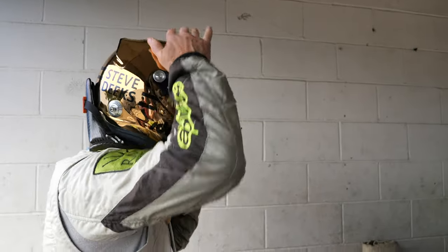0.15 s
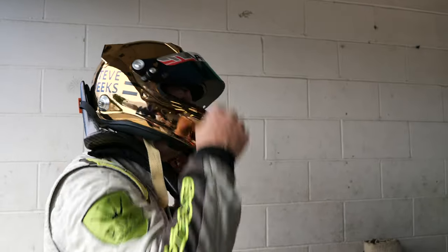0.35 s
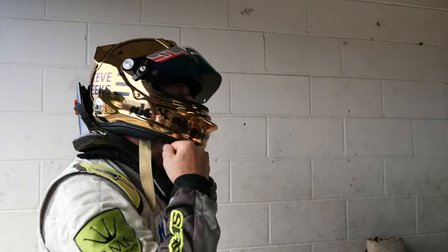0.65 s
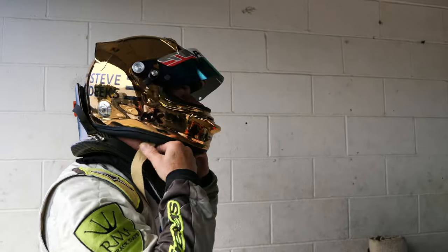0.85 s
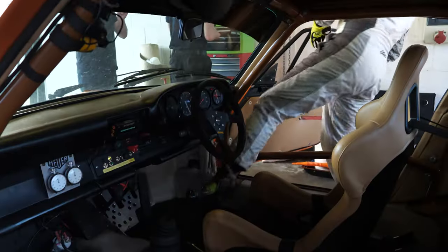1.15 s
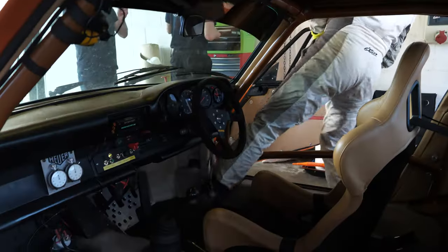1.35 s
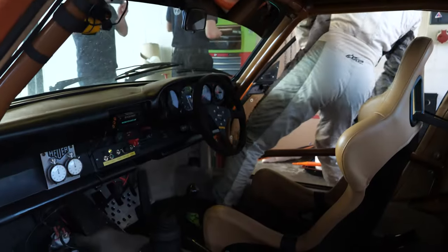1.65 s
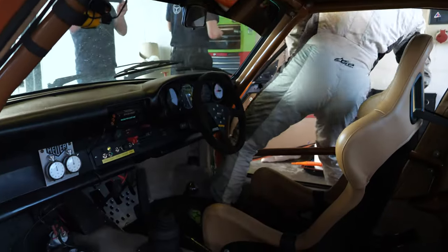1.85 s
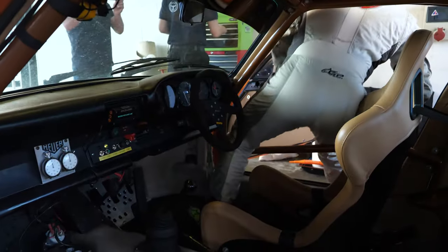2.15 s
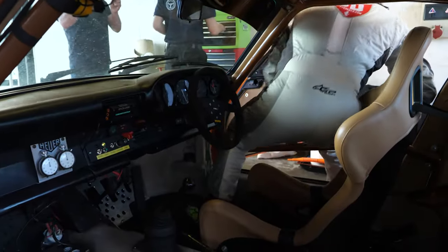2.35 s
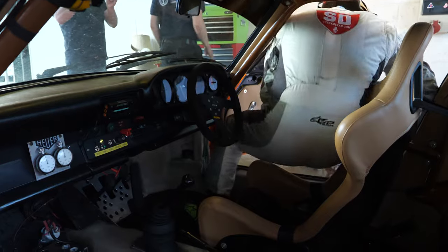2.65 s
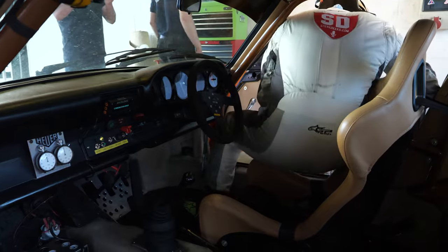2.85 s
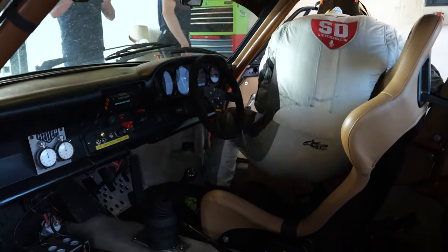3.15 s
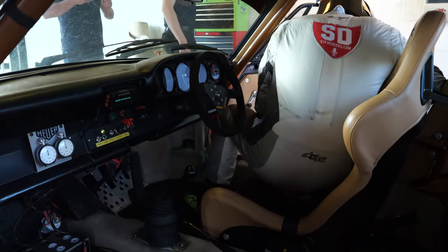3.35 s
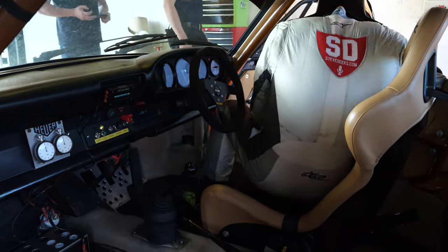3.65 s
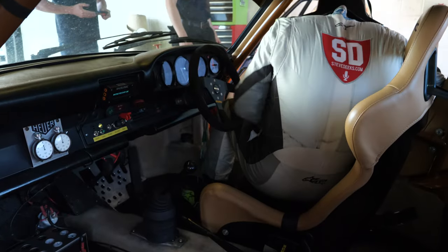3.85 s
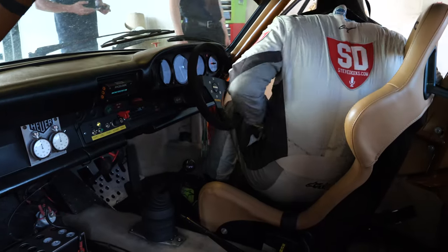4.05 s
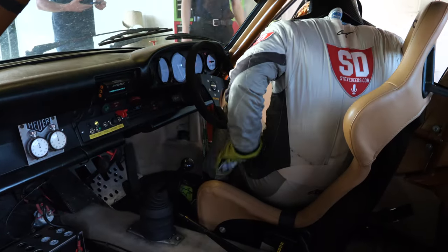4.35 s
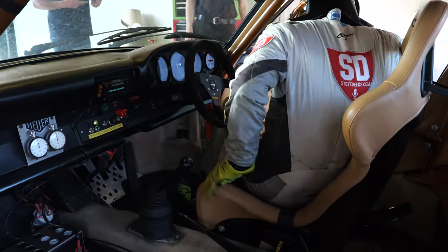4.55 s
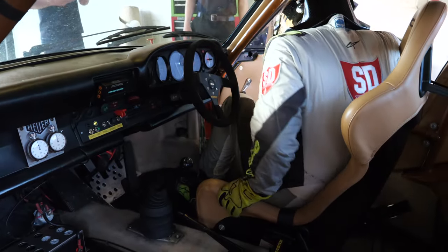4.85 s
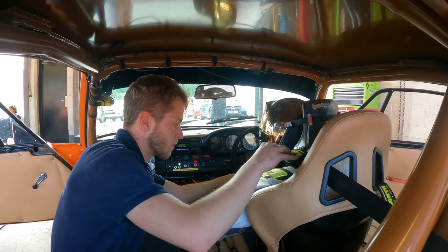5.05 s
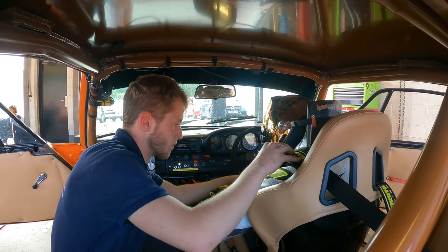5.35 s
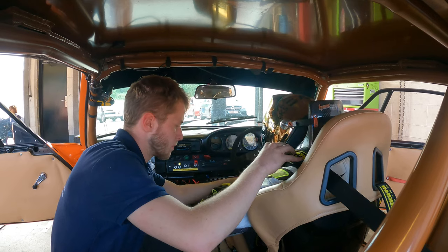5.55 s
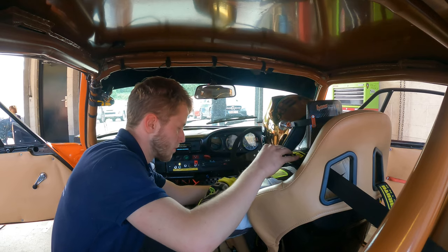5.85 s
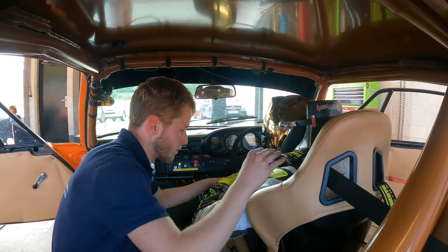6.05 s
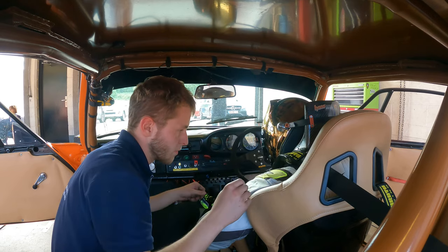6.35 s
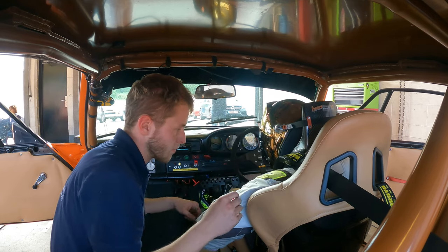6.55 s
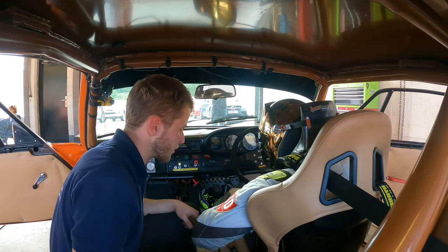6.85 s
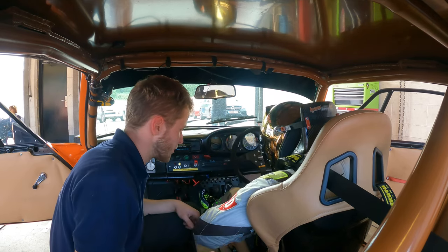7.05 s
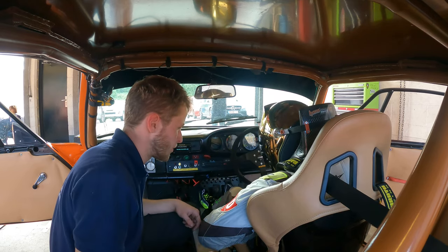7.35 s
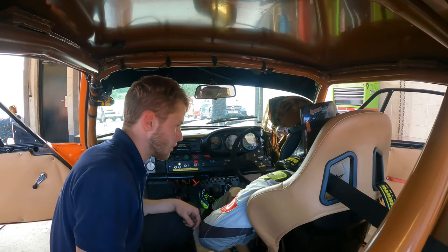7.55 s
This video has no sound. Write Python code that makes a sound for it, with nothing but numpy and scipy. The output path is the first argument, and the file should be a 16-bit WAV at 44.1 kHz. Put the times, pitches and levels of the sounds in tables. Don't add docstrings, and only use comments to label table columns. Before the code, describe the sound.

A race car engine idles in a steady deep drone inside a garage, with faint metal ticks early and a latch knock just past four seconds.

```python
import sys
import numpy as np
from scipy import signal
from scipy.fft import rfft, irfft, next_fast_len
from scipy.io import wavfile
from scipy.ndimage import uniform_filter1d, map_coordinates

SR = 44100
rng = np.random.default_rng(int(sys.argv[2]) if len(sys.argv) > 2 else 0)


def transcribe(signal):
    frames = np.atleast_2d(signal).T
    limited = np.clip(frames, -1, 1)
    pcm = np.round(limited * 32767).astype(np.int16)
    wavfile.write(sys.argv[1], SR, pcm)


def convert_level_to_amplitude(level_db):
    exponent = np.asarray(level_db, float) / 20
    return 10 ** exponent


N = 339129

# start in seconds, crank angle in rad per order,
# turn of orders 11, 12, 13 and 14 by the boom resonance in rad.
PLACES = [
    (0, .25, 0, 2.2, 1.5, 4.6),
    (1.0495, .35, 0, .3, .45, -.4),
    (1.595, 1.32, 3, 1.2, 1.4, -1.4),
    (4.983, 1.7, 3.7, 0, -.8, -.4),
]
ORDER_DB = [
    [-37, -45, -39, -34, -28, -13, -34, -33, -23, -27, -28, 0, -17, -22, -19, -21, -24, -9, -25, -33, -30,
     -28, -33, -27, -34, -37, -38, -37],
    [-31, -37, -25, -32, -22, -2, -21, -24, -20, -24, -25, 0, -5, -19, -21, -20, -19, -10, -18, -23, -25,
     -28, -27, -23, -26, -24, -26, -22],
    [-33, -35, -24, -25, -22, 0, -19, -20, -15, -18, -15, -1, -4, -14, -15, -14, -20, -18, -15, -26, -21,
     -26, -30, -21, -23, -22, -22, -22],
    [-32, -24, -12, -20, -20, -1, -21, -21, -20, -20, -14, 0, -10, -20, -22, -22, -22, -20, -21, -29, -28,
     -27, -32, -30, -24, -28, -33, -33],
]
# frequency in Hz, density in dB per Hz.
ROAR_SPECTRA = [
    [(15, -30), (50, -8), (100, -8), (170, -4), (230, -2.5)] + [(190, -46), (330, -2.0), (354, -4.5), (424, -1.0), (507, -5.0), (559, -2.5), (793, -8.5), (1220, -5), (1520, -7), (1870, -13.0), (2800, -19.5), (3640, -48), (6160, -120)][1:],
    [(15, -18), (50, -9.0), (100, 5), (200, -1.5)] + [(190, -34), (330, -2.5), (361, -0.5), (395, -7.0), (439, -1.5), (559, -6.5), (779, -9.5), (1150, -8.5), (1520, -9), (1790, -14.0), (2800, -23.5), (3640, -34), (6160, -120)][1:],
    [(15, -7.5), (30, 12), (100, 9.0), (200, -0.5)] + [(190, -31), (330, -3.5), (399, -6), (487, -7.5), (513, -13.0), (583, -5.0), (651, -9.5), (761, -7.5), (837, -12.5), (1170, -7.5), (1250, -15.5), (1620, -48), (2750, -120)][1:-2] + [(1520, -15.5), (1640, -21.0), (2800, -29.0), (3640, -61), (6000, -120)],
]
# frequency in Hz, density in dB per Hz.
HISS_SPECTRA = [
    [(1650, -47), (2800, -4), (3240, -3), (5380, -3.5), (9640, -18), (11200, -19.5), (12400, -24),
     (13800, -25), (15000, -32)],
    [(1650, -31), (2800, -1), (3660, -4), (4740, -1), (5420, -2), (6370, -7.5), (9050, -15), (11200, -19),
     (15000, -26.5)],
    [(1650, -28), (2800, -2), (4200, -6.5), (4860, -8.0), (7140, -16.5), (8250, -18.5), (9930, -28.0),
     (12600, -33.5), (14500, -40.5)] + [(15000, -43.5), (15300, -90)],
]
# multiple of the cycle rate, blur in Hz, level against the roar in dB.
WHINES = [
    [(54.3, 5.7, -16), (42.15, 12.6, -12)],
    [(113, 7.4, -12), (35.95, 8.06, -12.5), (56, 9.5, -12), (150, 7.5, -16.5)],
    [(25.4, 2, -10.5), (32.2, 3, -11), (37.5, 3, -11.5), (74.9, 3.5, -13.5), (113.3, 10, -18)],
]
# start in seconds, rattle in dB, t60 in seconds, brightness in dB, blow in dB.
LATCH_CONTACTS = [
    (4.0275, -31.5, 0.069, 1, -34),
    (4.037, -37, 0.097, 2.5, -44),
    (4.195, -19, 0.11, -15.5, -36),
    (4.2038, -7.5, .012, 1.5, -5),
    (4.207, -20, 0.095, -0.5, -4.5),
    (4.226, -29, 0.16, -9, -19),
    (1.634, -23.5, 0.057, -22.5, -33.5),
    (2.3, -28.5, 0.11, -15, -40),
]
# centre in Hz, width in Hz, level in dB.
LATCH_MODES = [(153, 19, 9.5), (281, 49, -2), (492, 35, 1.5), (606, 45, 1), (855, 29, -1.5),
               (1010, 22, -6.5), (1242, 78, -14), (1645, 250, -5.5), (2500, 490, -9.5), (4780, 970, -9),
               (8240, 1500, -20), (9900, 770, -19), (13000, 3000, -34.5)]
# start in seconds, frequency in Hz, peak in dB, t60 in seconds.
STRAP_TICKS = [(.245, 13750, -57, .05), (.36, 13370, -61.5, .05), (.49, 13200, -49, .08),
               (.49, 12540, -47.5, .07), (.492, 10250, -48, .06), (.785, 14300, -52, .05),
               (.785, 13300, -49, .05), (.785, 8540, -47, .05), (.786, 15200, -59, .04),
               (.787, 11300, -47.5, 0.07), (1.425, 11700, -49, .08)]
# start in seconds, level in dB.
STEPS = [
    (1.0502, -40),
    (1.5958, -17),
    (4.983, -23),
    (7.6895, -27),
]
# centre in seconds, frequency in Hz, peak in dB, length in seconds.
PANEL_SWELLS = [
    (.34, 572, -35, .07),
    (.58, 375, -36, .04),
    (5.22, 580, -33.5, .05),
    (6.12, 578, -35.5, .04),
    (6.7, 580, -35.5, .05),
]
# centre in seconds, speed change in cycles per second, length in seconds.
IDLE_HUNTS = [(0.18, -0.06, 0.098), (0.42, 0.2, 0.072), (0.78, 0.09, 0.072), (2.58, -0.12, 0.153),
              (2.85, 0.2, 0.06), (3.2, -0.07, 0.074), (3.37, 0.08, 0.08), (4.08, 0.07, 0.048),
              (5.22, 0.24, 0.11), (5.89, -0.26, 0.184), (6.12, 0.29, 0.057), (6.39, 0.11, 0.139),
              (6.72, 0.26, 0.075), (6.87, -0.09, 0.111), (7.28, -0.08, 0.055), (7.59, 0.09, 0.053)]
# centre in seconds, sixth order in dB, twelfth order in dB, length in seconds.
ODD_FIRINGS = [(0.37, -1, 5, 0.1), (0.747, -3, 5, 0.1), (1.272, 2, 4.5, 0.074), (1.452, 3.5, -11, 0.068),
               (1.52, 4.5, 8, 0.11), (2.7, 2.5, 7.5, 0.12), (2.84, -6.5, -6.5, 0.19), (3.298, 3, 3, 0.043),
               (3.453, -1, -6, 0.056), (5.12, -1, -1, 0.03), (5.408, -10.7, 2.5, 0.028),
               (5.904, -5.5, -3.5, 0.2), (6.29, -5, 1.5, 0.2), (6.464, 7, -2.5, 0.045),
               (6.81, -6.3, 0, 0.069), (7.35, -2.8, -5, 0.042)]
# sixth, twelfth, uneven orders, roar, hiss in dB per extra cycle per second.
LABOUR_DB = (-31, -3, 6, 2.5, 1)
# sixth, twelfth, uneven orders, roar, hiss in dB.
ARRIVAL_DB = [
    (-35, -22.5, -20.2, -33, -47.5),
    (-27.5, -20.5, -21, -26, -41.5),
    (-22, -22.5, -23, -30, -44),
    (-20, -20.5, -21.5, -36, -56),
]
# sixth, twelfth, uneven orders, roar, hiss in dB per second.
DRIFT_DB_PER_S = [
    (4, .1, -2.5, 0, -.6),
    (9, 0.11, -8, -3.5, -1.2),
    (-0.47, 0.13, -0.1, -0.67, -0.88),
    (-0.96, .1, 0, -0.32, -0.38),
]
# centre in seconds, gain on roar and hiss in dB, length in seconds.
DOORWAY_SWELL = (2.28, 2.15, 0.081)

T = np.arange(N) / SR
IDLE_CYCLES_PER_S, LABOUR_LAG_S = 9.964, 0.054
DUCK_S, DUCK_DB, DUCK_ATTACK_S, RECOVER_DB_PER_S = 4.21, -4.5, 0.021, 2.4
BOOM_STEP = 8
LINGER_S = .14
TOP_HZ = 15650


def unit(x):
    return x / np.sqrt(np.mean(x ** 2) + 1e-20)


def wobble(knots_per_s):
    t = T[::64]
    knots = rng.standard_normal(int(N * knots_per_s / SR) + 4)
    return np.interp(T, t, map_coordinates(knots, [t * knots_per_s]))


def bumps(s, size, length_s):
    t = T[::64]
    bells = np.exp(-((t[:, None] - s) / length_s) ** 2)
    return np.interp(T, t, bells @ np.asarray(size))


def filtered(x, response):
    m = next_fast_len(N + 8192)
    return irfft(rfft(x, m) * response(np.fft.rfftfreq(m, 1 / SR)), m)[:N]


def resonance_sum(f, modes):
    total = 0
    for k, (hz, width_hz, db) in enumerate(modes):
        damping = 1j * f * width_hz
        total = total + (-1) ** k * convert_level_to_amplitude(db) * damping / (hz * hz - f * f + damping)
    return total


def coloured(x, spectrum):
    hz, db = np.transpose(spectrum)
    return unit(filtered(x, lambda f: convert_level_to_amplitude(np.interp(np.log(f + 1), np.log(hz + 1), db))))


def patchy(patchy_db):
    z = signal.stft(rng.standard_normal(N), nperseg=512)[2]
    field = uniform_filter1d(rng.standard_normal(z.shape), 5, 0)
    field = uniform_filter1d(field, 8, 1)
    return signal.istft(z * convert_level_to_amplitude(patchy_db * unit(field)), nperseg=512)[1][:N]


def holed(x):
    hz, _, z = signal.stft(x, SR, nperseg=1024)
    rows, columns = z.shape
    chance = rng.random((rows // 4 + 1, columns // 5 + 1))
    chance = np.repeat(np.repeat(chance, 4, 0), 5, 1)[:rows, :columns]
    lost_share = np.interp(hz, [6500, 9000, 15500], [0, .16, .34])[:, None]
    return signal.istft(z * (chance > lost_share), SR, nperseg=1024)[1][:N]


def layer_levels(place):
    since_s = T - np.array(PLACES)[place, 0]
    db = np.array(ARRIVAL_DB)[place].T + np.array(DRIFT_DB_PER_S)[place].T * since_s

    s, change, length_s = np.transpose(IDLE_HUNTS)
    db = db + np.outer(LABOUR_DB, bumps(s + LABOUR_LAG_S, change, length_s))

    after_s = np.clip(T - DUCK_S, 0, None)
    duck_db = DUCK_DB * (1 - np.exp(-after_s / DUCK_ATTACK_S)) + RECOVER_DB_PER_S * after_s
    db = db + (place == 2) * duck_db

    s, sixth_db, twelfth_db, length_s = np.transpose(ODD_FIRINGS)
    swell_s, gain_db, swell_length_s = DOORWAY_SWELL
    swell_db = bumps(swell_s, [gain_db], swell_length_s)
    return db + [bumps(s, sixth_db, length_s), bumps(s, twelfth_db, length_s), 0 * T, swell_db, swell_db]


def scene_steps():
    return sum(convert_level_to_amplitude(db) * (T >= s) * np.exp(-np.abs(T - s) / 0.00039) for s, db in STEPS)


def strap_ticks():
    out, t = np.zeros(N), T[:SR // 10]
    for s, hz, db, t60_s in STRAP_TICKS:
        jitter = .11 * np.cumsum(rng.standard_normal(len(t)))
        jangle = np.sin(2 * np.pi * hz * t + jitter)
        out[round(s * SR):][:len(t)] += convert_level_to_amplitude(db - 60 * t / t60_s) * (1 - np.exp(-t / .004)) * jangle
    return out


def body_panel():
    out = np.zeros(N)
    for s, hz, db, length_s in PANEL_SWELLS:
        out += convert_level_to_amplitude(db) * np.exp(-((T - s) / length_s) ** 2) * np.sin(2 * np.pi * hz * T)
    return out


def latch():
    dull, bright, t = np.zeros(N), np.zeros(N), T[:SR // 4]
    for s, db, t60_s, bright_db, blow_db in LATCH_CONTACTS:
        i = round(s * SR)
        rattle = convert_level_to_amplitude(db + 20 - 60 * t / t60_s) * rng.standard_normal(len(t))
        dull[i:][:len(t)] += rattle
        bright[i:][:len(t)] += rattle * convert_level_to_amplitude(bright_db)
        dull[i] += convert_level_to_amplitude(blow_db + 35.5)
    panel = filtered(dull, lambda f: resonance_sum(f, LATCH_MODES[:8]) / (1 + 1j * f / 3500) ** 2)
    return panel + filtered(bright, lambda f: resonance_sum(f, LATCH_MODES[8:]))


def whine(crank, multiple, blur_hz, db):
    walk = uniform_filter1d(np.cumsum(rng.standard_normal(N)), size=150)
    blur = np.sqrt(2 * np.pi * blur_hz / SR) * walk
    return np.sqrt(2) * convert_level_to_amplitude(db + 1.4 * wobble(8.3)) * np.cos(multiple * crank + blur)


def roar(crank, place, level_db):
    roar_db, hiss_db = level_db[3:]
    cycle_beat = .5 * np.cos(crank + 1.4 * wobble(3))
    firing_beat = 0.77 * np.cos(6 * crank + 0.22 * wobble(8))
    beat_db = cycle_beat + firing_beat
    air, fan = patchy(patchy_db=0.32), patchy(patchy_db=0.95)
    holed_fan = holed(fan)
    fans = [holed_fan, holed_fan, fan]
    colour = np.array([0, 1, 1, 2])[place]
    out = np.zeros(N)
    for k in range(3):
        body = coloured(air, ROAR_SPECTRA[k])
        body = body / np.std(filtered(body, lambda f: (f > 300) & (f < 1800)))
        tones = sum(whine(crank, *row) for row in WHINES[k])
        hiss = convert_level_to_amplitude(hiss_db + .3 * beat_db) * coloured(fans[k], HISS_SPECTRA[k])
        out += (colour == k) * (convert_level_to_amplitude(roar_db + beat_db) * (body + tones) + hiss)
    return out


def exhaust(crank, place, level_db):
    firing_db, double_db, uneven_db = uniform_filter1d(level_db[:3], size=800, axis=1)[:, ::BOOM_STEP]
    late_place = place * (T > PLACES[1][0] + LINGER_S)
    places, order_db = np.array(PLACES), np.array(ORDER_DB)
    out = 0
    for k in range(1, 29):
        steady = k in (3, 6, 11, 12, 13, 14, 18)
        if k == 6:
            db = firing_db
        elif k == 12:
            db = double_db
        else:
            drift_db = (1.2 if steady else 2.5) * wobble(5)[::BOOM_STEP]
            db = uneven_db + drift_db + 1.6 * (k == 18)
        size = convert_level_to_amplitude(order_db[:, k - 1] * (k not in (6, 12)))
        turn = rng.uniform(0, 2 * np.pi, 4) * (k != 6)
        if 11 <= k <= 14:
            turn = places[:, k - 9]
        lag = k * places[:, 1] + turn

        where = (late_place if k == 18 else place)[::BOOM_STEP]
        in_phase = uniform_filter1d((size * np.cos(lag))[where], size=100)
        quadrature = uniform_filter1d((size * np.sin(lag))[where], size=100)
        angle = k * crank[::BOOM_STEP] + (.09 if steady else .33) * wobble(7)[::BOOM_STEP]
        out += convert_level_to_amplitude(db) * (in_phase * np.cos(angle) - quadrature * np.sin(angle))
    return np.sqrt(2) * signal.resample_poly(out, BOOM_STEP, 1, padtype="edge")[:N]


def scene():
    cycles_per_s = IDLE_CYCLES_PER_S + bumps(*np.transpose(IDLE_HUNTS))
    crank = 2 * np.pi * np.cumsum(cycles_per_s) / SR
    place = np.searchsorted(np.array(PLACES)[:, 0], T, "right") - 1
    level_db = layer_levels(place)
    metal = scene_steps() + strap_ticks() + body_panel() + latch()
    engine = roar(crank, place, level_db) + exhaust(crank, place, level_db)
    return (metal + engine)[None]


def roll_off(x):
    return signal.sosfilt(signal.butter(12, 15820, fs=SR, output="sos"), x)


def record(dry):
    held = dry[0] / (1 + np.abs(dry[0] / .76) ** 6) ** (1 / 6)
    mix = filtered(held, lambda f: f < TOP_HZ)[None]
    return roll_off(mix)


dry = scene()
out = record(dry)
transcribe(out)
```